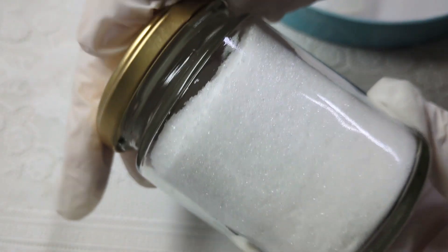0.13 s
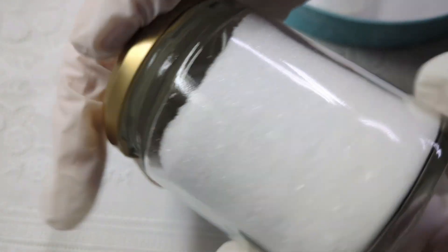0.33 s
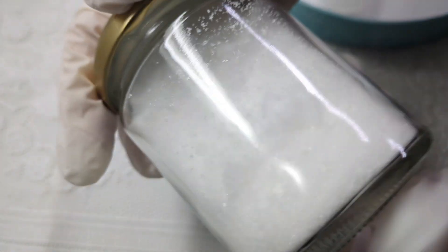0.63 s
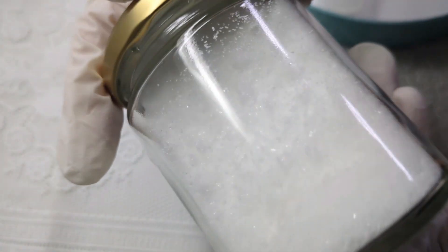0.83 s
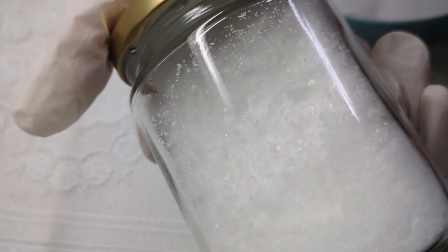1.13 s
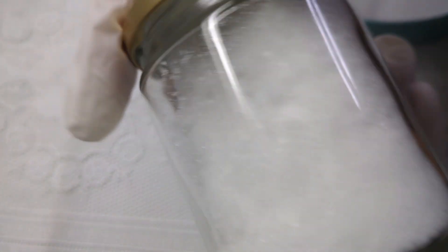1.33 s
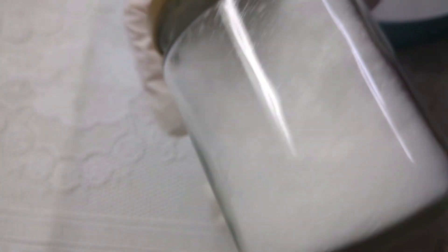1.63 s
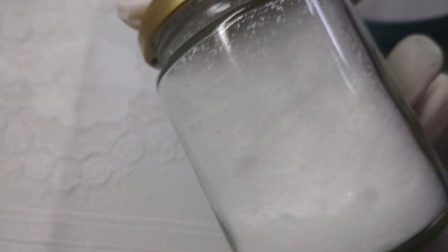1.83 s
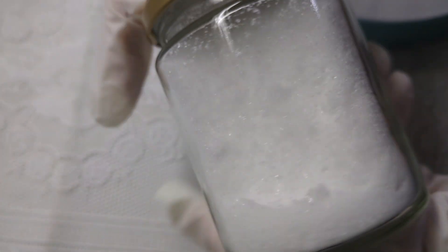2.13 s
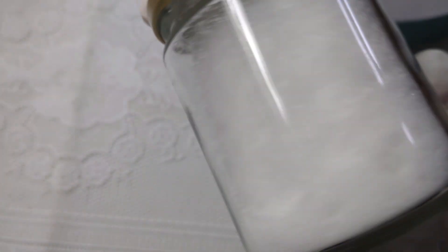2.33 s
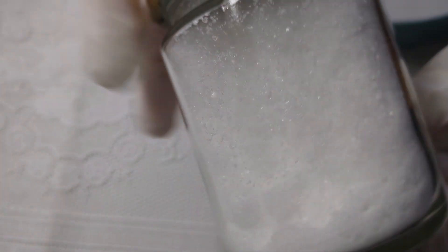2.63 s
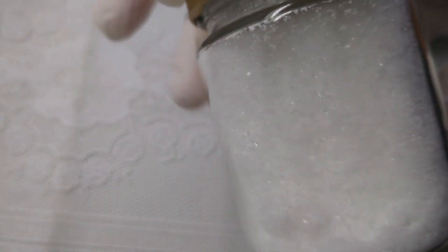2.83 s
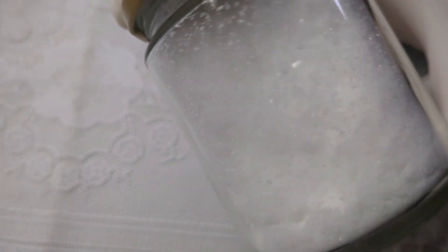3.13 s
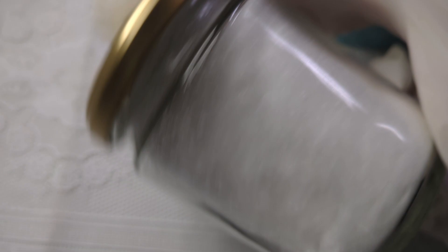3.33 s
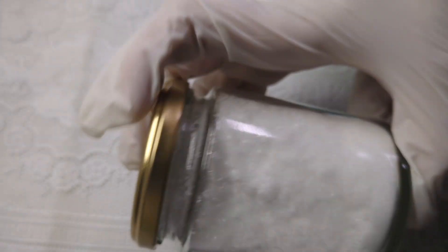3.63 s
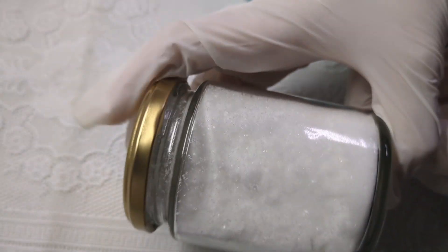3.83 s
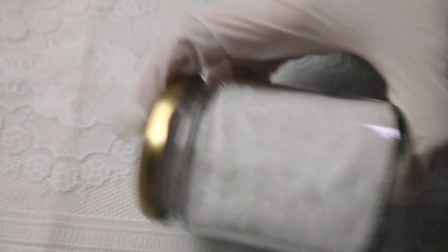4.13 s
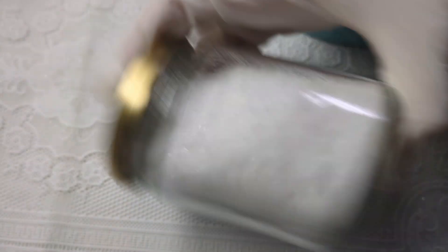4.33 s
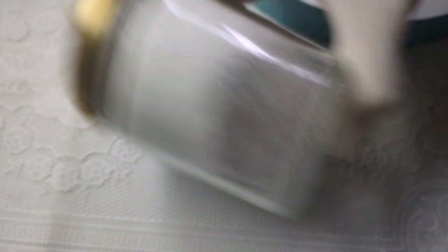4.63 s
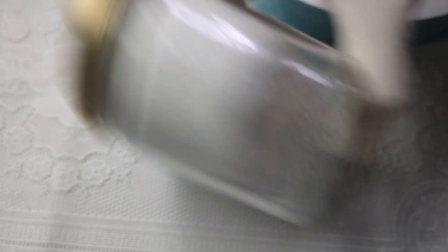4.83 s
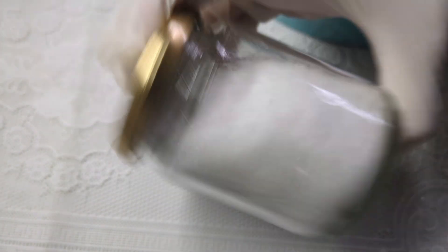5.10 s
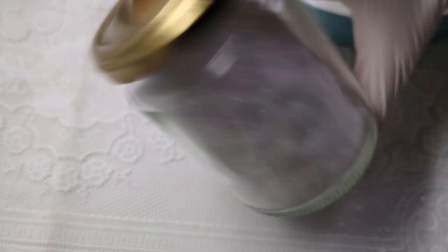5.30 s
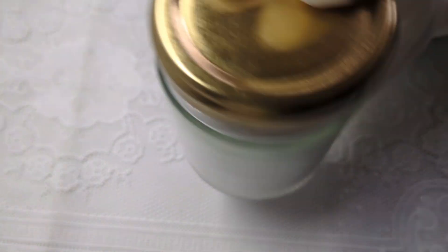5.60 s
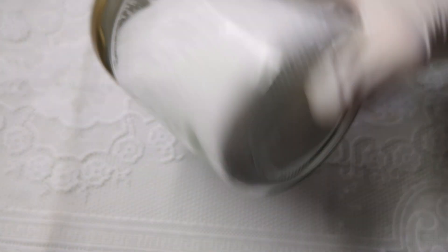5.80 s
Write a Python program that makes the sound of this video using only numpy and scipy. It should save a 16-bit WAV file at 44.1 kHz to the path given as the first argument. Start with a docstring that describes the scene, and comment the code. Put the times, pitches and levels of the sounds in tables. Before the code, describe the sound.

Gloved hands turn a glass jar of fine crystals with rubbing and ticks; the metal lid snaps once, then five quick shakes follow.

```python
"""Over a low rumble and the hiss of far traffic, gloved hands turn a glass jar of fine crystals, close up
in a small room. Rubber rubs, ticks and squeaks on the glass; the powder trickles, and slumps as the jar
tips. The traffic fades, and a little past halfway the metal lid snaps once. Then five quick shakes throw
the powder against the far end, each with a thin, singing backflow, and a few last tilts let it slide."""
import sys
import numpy as np
from scipy import signal
from scipy.fft import rfft, irfft
from scipy.io import wavfile
from scipy.ndimage import uniform_filter1d

SR = 44100
rng = np.random.default_rng(int(sys.argv[2]) if len(sys.argv) > 2 else 0)


def waveform_to_disk(signal):
    """Save audio, clipped to [-1, 1], as 16-bit WAV at the path in sys.argv[1]."""
    frames = np.transpose(np.atleast_2d(signal))
    scaled = np.clip(frames, -1, 1) * 32767
    samples = np.round(scaled).astype(np.int16)
    wavfile.write(sys.argv[1], SR, samples)


N = 262836
TIME = np.arange(N) / SR
BINS = np.fft.rfftfreq(4096, 1 / SR)


def amp(db):
    """Decibels to gain."""
    return 10 ** (np.asarray(db) / 20)


def eq_curve(points):
    """A curve at BINS, its points joined on a log-frequency axis."""
    hz, value = np.transpose(points)
    return np.interp(np.log(BINS + 1), np.log(hz + 1), value)


def automation(points):
    """A time curve at every sample."""
    return np.interp(TIME, *np.transpose(points))


def unit_rms(x):
    """Scales to rms 1."""
    return x / np.sqrt(np.mean(x ** 2) + 1e-20)


def add(mix, start_s, sound):
    """Lays a stereo sound into the mix."""
    part = mix[:, round(start_s * SR):][:, :sound.shape[1]]
    part += sound[:, :part.shape[1]]


def swell(peak_s, rise_s, fall_s):
    """A rounded hump of gain."""
    return np.exp(-np.maximum((peak_s - TIME) / rise_s, (TIME - peak_s) / fall_s) ** 1.49)


# Stereo image, near mono in the bass and wide on top: freq_hz, correlation
STEREO_IMAGE = [(60, .998), (130, .97), (300, .8), (700, .6), (1400, -.1), (3000, -.2), (5500, .2),
                (9000, .05), (16000, 0)]
def colour(x, eq_db, lead=512):
    """Causal EQ that treats its two inputs as mid and side and returns left and right."""
    log_gain = np.log(amp(np.r_[eq_db, eq_db[-2:0:-1]]))
    response = np.exp(np.conj(signal.hilbert(log_gain)))[:len(BINS)]  # minimum phase
    angle = np.arccos(np.clip(eq_curve(STEREO_IMAGE), -1, 1)) / 2
    taps = np.roll(irfft(response * np.array([np.cos(angle), np.sin(angle)])), lead, axis=1)
    mid, side = signal.oaconvolve(x, taps, axes=1)[:, lead:lead + x.shape[1]]
    return np.array([mid + side, mid - side])


def noise(eq):
    """Steady coloured noise of rms 1."""
    return unit_rms(colour(rng.standard_normal((2, N)), eq_curve(eq)))


# The rumble's slow drift: time_s, level_db
RUMBLE_DRIFT = [(0, -49), (.6, -48.5), (2, -51), (3.7, -51), (4.8, -49), (5.96, -52)]
# Tone of the rumble and the hiss: freq_hz, gain_db
RUMBLE_EQ = [(20, -48), (31, -40.5), (40, -12), (50, -3), (62, 1.5), (78, -2.5), (100, -6.5), (112, -6.5),
             (128, -6), (150, -17.5), (200, -29.5), (260, -33.5), (400, -44), (900, -82)]
HISS_EQ = [(100, 5), (400, 4), (800, -2), (1500, 5), (3000, -1), (5000, -2), (7500, -3), (10000, -14.5),
           (16000, -46)]
def room_tone():
    """The bed: building rumble, faint mains hum and microphone hiss."""
    rumble = amp(automation(RUMBLE_DRIFT)) * noise(RUMBLE_EQ)
    hum = amp(-57.5) * np.sin(2 * np.pi * (60 * TIME + rng.random()))
    return rumble + hum + amp(-74.5) * noise(HISS_EQ)


# Tone of distant tyres: freq_hz, gain_db
TYRE_EQ = [(200, 1), (330, -6.5), (520, -14), (750, -9.5), (980, 5), (1250, -6), (1800, -10.5),
           (3000, -19.5), (8000, -51)]
def traffic(level_db=-65, leaves_s=1.69, fade_db_per_s=7.5):
    """Far tyres hiss steadily, then recede."""
    return amp(level_db - fade_db_per_s * np.maximum(TIME - leaves_s, 0)) * noise(TYRE_EQ)


# The jar's hollow body: centre_hz, width_hz, gain_db
JAR_BODY = [(664, 166, 11), (1154, 456, 11.5), (1815, 300, 9), (2764, 440, -3.5), (3640, 270, 3),
            (5360, 2400, 7), (7870, 550, 4), (12700, 2200, 1)]
def in_jar(eq):
    """An EQ curve in dB with the jar's broad resonances on top."""
    return eq_curve(eq) + sum(db / (1 + (2 * (BINS - hz) / width) ** 2) for hz, width, db in JAR_BODY)


def grains(per_s, spread_db):
    """Tiny impacts at random moments, mostly small and a few large."""
    strength = amp(spread_db * np.minimum(rng.exponential(1, N), 4))
    hits = rng.random(N) < per_s / SR
    return unit_rms(strength * hits * rng.standard_normal((2, N)))


def jerks(rate_hz, depth_db):
    """Uneven gain of something that catches and slips."""
    knots = np.arange(0, N / SR + 1, 1 / rate_hz)
    return amp(depth_db * np.interp(TIME, knots, rng.standard_normal(len(knots))))


def wander(x, depth_db, frame=512):
    """As the grip shifts, narrow bands swell and fade for some tens of milliseconds each."""
    bands = signal.stft(x, nperseg=frame)[2]
    blur = np.outer(np.hanning(7), np.hanning(13))
    patches = unit_rms(signal.oaconvolve(rng.standard_normal(bands.shape[1:]), blur, "same"))
    return unit_rms(signal.istft(bands * amp(depth_db * patches), nperseg=frame)[1][:, :N])


# Each turn of the jar in the hands: start_s, length_s, rub_db, trickle_db
TURNS = [(.29, 0.26, -68, -82), (0.55, 0.082, -57.5, -58), (0.694, 0.032, -62, -66.5),
         (1.382, 0.053, -61.5, -79), (1.489, .12, -58, -64.5), (1.618, .15, -63.5, -66),
         (1.78, 0.1, -65.5, -69), (1.884, 0.087, -60.5, -57.5), (2.023, 0.16, -67.5, -79),
         (2.153, 0.051, -62, -66.5), (2.283, 0.13, -64, -73), (2.432, 0.14, -62.5, -61),
         (2.612, 0.019, -57.5, -55), (2.667, 0.063, -65, -67.5), (3.012, 0.11, -62, -76),
         (3.094, 0.078, -59.5, -60), (3.229, 0.054, -60, -67), (3.351, 0.24, -64.5, -66.5),
         (3.758, .03, -67.5, -83), (3.852, 0.0076, -64.5, -73), (4.033, 0.017, -58, -61.5),
         (4.101, 0.082, -60, -59.5), (4.38, .1, -75, -62.5), (5.263, .045, -65, -65.5),
         (5.716, 0.1, -57, -61.5), (5.885, 0.08, -60, -63)]
def handling(rest_rub_db=-75, rest_trickle_db=-87, attack_s=0.018, release_s=0.025, sag_db_per_s=5.5):
    """Gains for gloves and trickle: the strongest turn at each moment, or the resting grip."""
    rub_gain, trickle_gain = amp(rest_rub_db), amp(rest_trickle_db)
    for start, length, rub_db, trickle_db in TURNS:
        t = TIME - start
        fade = np.maximum(-t, 0) / attack_s + np.maximum(t - length, 0) / release_s
        effort = np.exp(-np.minimum(fade, 20)) * amp(-sag_db_per_s * np.clip(t, 0, length))
        rub_gain = np.maximum(rub_gain, amp(rub_db) * effort)
        trickle_gain = np.maximum(trickle_gain, amp(trickle_db) * effort)
    return rub_gain, trickle_gain


# Dry rasp of rubber on glass: freq_hz, gain_db
RUB_EQ = [(150, -10), (350, -9.5), (550, -18.5), (1200, -12), (1900, -4), (2700, 5), (3500, -1.5),
          (5500, -9), (7000, -7.5), (10000, -16.5), (16000, -39)]
def gloves():
    """Rubber creeps over the glass in small slips."""
    slips = grains(per_s=5000, spread_db=2.5) * jerks(rate_hz=129.9, depth_db=3)
    return unit_rms(colour(wander(slips, depth_db=3), in_jar(RUB_EQ)))


# Fine sizzle of a thin stream of crystals: freq_hz, gain_db
TRICKLE_EQ = [(500, -24), (3000, -6), (5500, -12), (6700, -4), (7600, -4), (8500, 0), (9900, -4),
              (12000, -1.5), (13500, -4), (14200, -12), (16000, -8.5)]
def trickle():
    """Loose crystals run along the wall."""
    stream = grains(per_s=9000, spread_db=1) * jerks(rate_hz=109, depth_db=4)
    return unit_rms(colour(wander(stream, depth_db=2), in_jar(TRICKLE_EQ)))


def crack(decay_s, tail_db, tail_decay_s, size=6000):
    """A brief burst of noise with a weaker, slower tail, its spectrum evened out."""
    t = np.arange(size) / SR
    envelope = np.exp(-t / decay_s) + amp(tail_db) * np.exp(-t / tail_decay_s)
    burst = rfft(rng.choice([-1., 1.], (2, size)) * envelope)
    power = uniform_filter1d(abs(burst) ** 2, 41, axis=1)
    return irfft(burst * np.sqrt(power.mean() / power)) * (1 - t / t[-1]) ** 2


# Ringing modes of jar and lid: pitch_hz, level_db, t60_s
JAR_MODES = [(2634, -7.5, 0.11), (2960, 4, 0.061), (3830, -15, 0.1), (5730, -5, 0.016), (6700, -5, 0.083),
             (7850, -2, 0.035), (9050, -18, 0.11), (10900, -34, 0.049)]
def ring(size=6000):
    """Jar and lid ring out after one blow."""
    t = np.arange(size) / SR
    return sum(amp(db - 60 * t / t60) * np.sin(2 * np.pi * (hz * t + rng.random((2, 1))))
               for hz, db, t60 in JAR_MODES)


# Glove and grain ticks: start_s, level_db, bass_db, treble_db
TICKS = [(.299, -47, 5, -0.5), (.317, -39, 1, -23), (.331, -40.5, -13, -9), (.55, -33.5, -10, 0),
         (.559, -33, -2.5, -2), (.576, -36.5, 1, 0), (.644, -45.5, 2, 11), (.969, -55, 1, -2),
         (1.051, -42.5, -12, -16), (1.197, -50, -14, -16), (1.3, -45.5, 0, -4.5), (1.54, -31, -19, -8),
         (1.908, -38, -13, -1), (2.191, -35, -1.5, -4.5), (2.911, -38.5, 7.5, -12), (3.136, -41.5, -7, 4),
         (3.165, -39, 1.5, 7.5), (3.201, -47, 0, 3), (3.921, -35, -27, -29), (5.0924, -22.5, -12, -9),
         (5.276, -39.5, -13, -2), (5.874, -38, -19, 4), (5.933, -25.5, -36, -11)]
# Their common tone: freq_hz, gain_db
TICK_EQ = [(100, 11), (500, -18.5), (1100, -7), (2000, -4.5), (3800, -0.5), (6000, -6.5), (8200, -5.5),
           (12000, -8.5), (16000, -15)]
def ticks():
    """Fingertips let go and coarse grains strike the wall; the jar rings faintly."""
    out = np.zeros((2, N))
    for start, db, bass_db, treble_db in TICKS:
        tilt = eq_curve([(900, bass_db), (3000, 0.012), (9000, treble_db)])
        tick = colour(crack(decay_s=0.0009, tail_db=-13, tail_decay_s=0.0047), in_jar(TICK_EQ) + tilt)
        add(out, start, amp(db) * (tick + amp(-25) * ring()))
    return out


def resonance(drive, hz, width_hz):
    """One narrow resonance, at rms 1."""
    band = signal.butter(1, [hz - width_hz / 2, hz + width_hz / 2], "bandpass", fs=SR, output="sos")
    return unit_rms(signal.sosfilt(np.vstack([band, band]), drive))


# Brief rubbing tones: peak_s, level_db, pitch_hz, width_hz, half_length_s
SQUEAKS = [(.333, -53.5, 5700, 1200, 0.0023), (0.75, -70, 3000, 900, 0.046), (1.12, -74, 2350, 300, 0.037),
           (1.555, -49.5, 3590, 600, 0.019), (1.857, -66, 8000, 700, 0.028), (1.966, -61, 1990, 596, 0.024),
           (2.43, -60, 7900, 900, 0.021), (2.533, -54, 5230, 500, 0.013), (2.774, -70.5, 328, 70, 0.05),
           (3.123, -65, 342, 120, 0.027), (3.245, -67, 330, 70, 0.023), (3.259, -56.5, 3420, 450, .015),
           (3.99, -64, 3280, 900, 0.031), (5.095, -40, 3880, 600, 0.0055), (5.584, -58.5, 4000, 1000, 0.02),
           (5.828, -60, 2220, 350, 0.024)]
def squeaks(friction):
    """Rubber or crystals stick and slip on the glass, driving one narrow resonance at a time."""
    return sum(amp(db) * swell(peak, half, half) * resonance(friction, hz, width)
               for peak, db, hz, width, half in SQUEAKS)


# Fingertip skids: peak_s, level_db, fall_s
SKIDS = [(0.492, -58, 0.035), (0.554, -50, 0.008), (0.564, -51, 0.011), (0.579, -50.5, 0.025)]
# What a skid rings with: pitch_hz, width_hz, level_db
SKID_MODES = [(2687, 240, 1.5), (5060, 280, -9), (6730, 360, -14)]
def skids(friction, rise_s=0.0034):
    """A fingertip skids over the glass and sets three resonances going together."""
    envelope = sum(amp(db) * swell(peak, rise_s, fall) for peak, db, fall in SKIDS)
    return envelope * sum(amp(db) * resonance(friction, hz, width) for hz, width, db in SKID_MODES)


# Full-bodied rush of a mass of powder: freq_hz, gain_db
SURGE_EQ = [(100, -1), (300, -6.5), (500, -10.5), (900, -18), (1400, -14), (2000, -0.5), (2600, 2),
            (4200, -0.5), (6800, -6.5), (8500, -1), (10000, -2.5), (13000, -4), (15800, -13)]
def surge(shower, peak_s, db, rise_s, fall_s, lightness):
    """A swell of crystals hits the glass; lightness runs from 0, the full mass, to 1, only sizzle."""
    eq_db = (1 - lightness) * in_jar(SURGE_EQ) + lightness * in_jar(TRICKLE_EQ)
    eq_rms = np.sqrt(np.mean(amp(eq_db) ** 2))
    start = round((peak_s - .2) * SR)
    rush = (shower * swell(peak_s, rise_s, fall_s))[:, start:start + SR // 2]
    out = np.zeros((2, N))
    add(out, start / SR, amp(db) * colour(rush, eq_db) / eq_rms)
    return out


# Powder slides: peak_s, level_db, rise_s, fall_s, lightness
SLIDES = [(.591, -45.5, 0.03, 0.012, 0.3), (1.548, -47, 0.02, .043, 0.55), (5.585, -54, 0.027, 0.013, 1),
          (5.884, -47, 0.014, 0.014, .22), (5.929, -46, .023, .024, 0.25)]
def slides(shower):
    """The powder slumps against the wall as the jar tips."""
    return sum(surge(shower, *slide) for slide in SLIDES)


# The lid's snap and its after-blow: start_s, level_db, decay_s
LID_BLOWS = [(3.3638, -14, 0.0016), (3.367, -15, 0.00023)]
# Tone of the snap: freq_hz, gain_db
LID_EQ = [(100, -17), (400, -15.5), (700, -4), (1000, -2), (1400, -15), (2000, 1.5), (2800, 1.5),
          (4000, -2.5), (4700, -9.5), (5600, -1.5), (7000, -10), (8100, -4), (10000, -12.5), (15500, -23)]
def lid():
    """The metal lid snaps under the fingers, its ring damped by the hand."""
    out = np.zeros((2, N))
    for start, db, decay in LID_BLOWS:
        blow = colour(crack(decay, tail_db=-18, tail_decay_s=0.009), eq_curve(LID_EQ))
        add(out, start, amp(db) * (blow + amp(-42) * ring()))
    return out


# Shakes, about five a second: hit_s, hit_db, half_length_s, backflow_db, landing_delay_s, landing_db
SHAKES = [(4.331, -44.5, 0.024, -72, 0.21, -74), (4.518, -41, 0.022, -61, .121, -52),
          (4.707, -40, 0.019, -60, 0.11, -49.5), (4.894, -40.5, 0.02, -59.5, 0.117, -46.5),
          (5.089, -39.5, 0.02, -58, 0.13, -52)]
def shakes(shower, friction):
    """The powder hits the far end, runs back in a thin stream that sings briefly, and lands."""
    whistle_tone = resonance(friction, hz=7700, width_hz=810)
    out = np.zeros((2, N))
    for hit, hit_db, half, backflow_db, delay, landing_db in SHAKES:
        throw = surge(shower, hit, hit_db, half, half, lightness=0.18)
        whistle = amp(backflow_db + 2) * swell(hit + 0.077, rise_s=0.011, fall_s=0.011) * whistle_tone
        backflow = surge(shower, hit + 0.084, backflow_db, rise_s=0.021, fall_s=0.067, lightness=0.79)
        landing = surge(shower, hit + delay, landing_db, rise_s=0.0035, fall_s=0.0065, lightness=1)
        out += throw + whistle + backflow + landing
    return out


# The jar's drift in the image: time_s, left_minus_right_db
PAN = [(0, 1.5), (.56, 3.5), (1.6, 1), (3.25, 2), (3.37, 2), (4.7, 5.5), (5.1, 3), (5.96, 2.5)]
def pan(jar, crossover_hz=700):
    """The highs lean a little to the left; both microphones hear the bass equally."""
    bass = signal.sosfiltfilt(signal.butter(2, crossover_hz, fs=SR, output="sos"), jar)
    return bass + (jar - bass) * amp(np.array([[.5], [-.5]]) * automation(PAN))


def reverb(x, t60_s=0.12, wet_db=-15, size=16000):
    """A short, soft tail from the table and walls."""
    t = np.arange(size) / SR
    reflections = rng.standard_normal((2, size)) * (rng.random((2, size)) < .1)
    envelope = amp(-60 * t / t60_s) * (t > .004)  # 4 ms pre-delay
    tail = colour(reflections * envelope, eq_curve([(200, 18), (4000, -3.5), (9000, -21), (16000, 12.5)]))
    return amp(wet_db) * signal.oaconvolve(x, tail / np.linalg.norm(tail[0]), axes=1)[:, :N]


def scene():
    """The handled jar, panned and set in its room, over the bed and the traffic."""
    rub_gain, trickle_gain = handling()
    turning = rub_gain * gloves() + trickle_gain * trickle()
    crystals = grains(per_s=14000, spread_db=2.1) * jerks(rate_hz=261, depth_db=0.9)
    shower = wander(crystals, depth_db=3.5)
    friction = rng.standard_normal((2, N))
    contacts = ticks() + squeaks(friction) + skids(friction)
    jar = pan(turning + contacts + slides(shower) + lid() + shakes(shower, friction))
    return jar + reverb(jar) + room_tone() + traffic()


def record(dry, cutoff_hz=15900):
    """A steep low-pass trims the very top."""
    lowpass = signal.firwin(511, cutoff_hz, window=("kaiser", 9), fs=SR)
    return signal.oaconvolve(dry, lowpass[None], "same")


dry = scene()
out = record(dry)
waveform_to_disk(out)
```